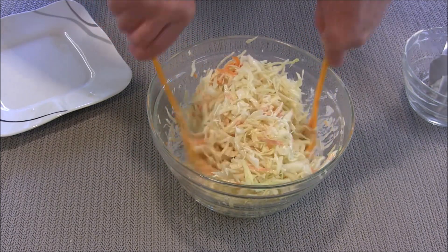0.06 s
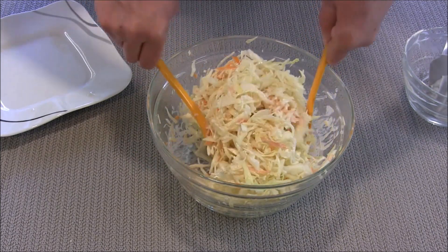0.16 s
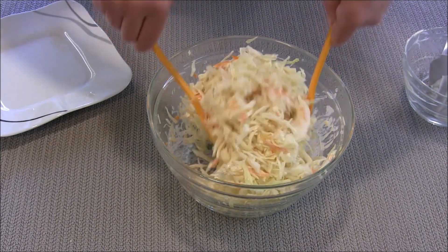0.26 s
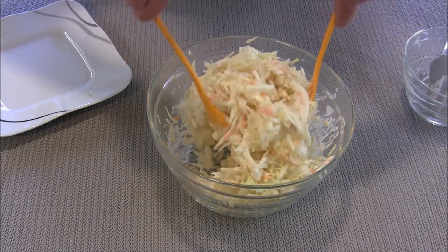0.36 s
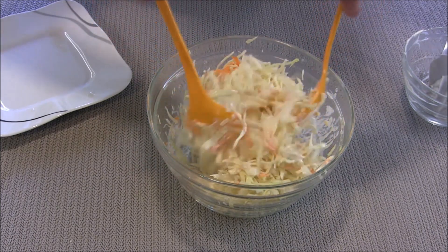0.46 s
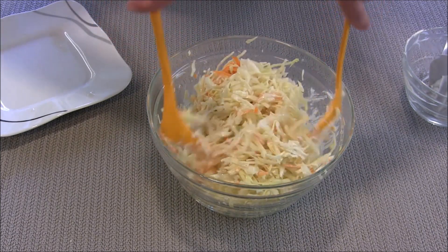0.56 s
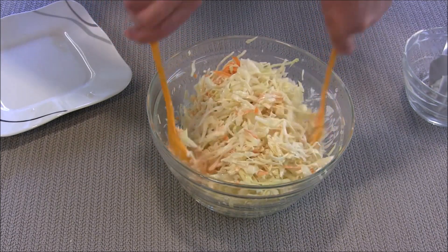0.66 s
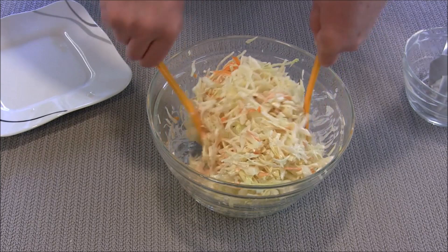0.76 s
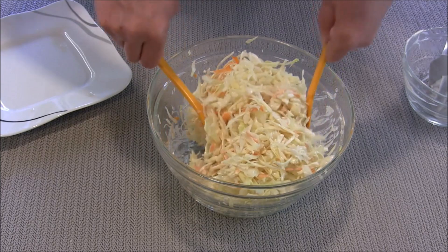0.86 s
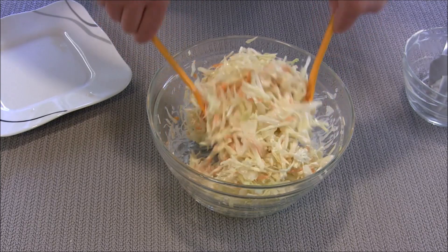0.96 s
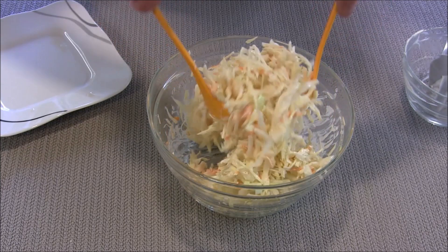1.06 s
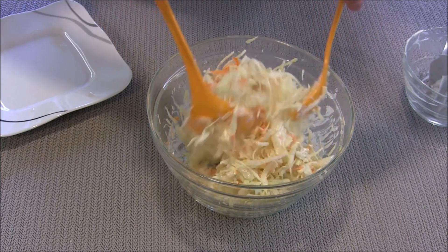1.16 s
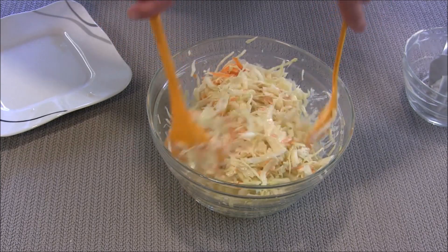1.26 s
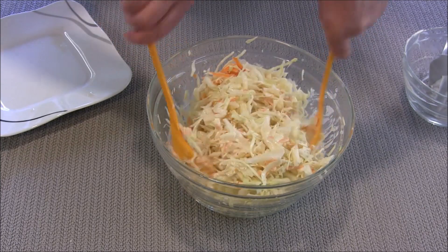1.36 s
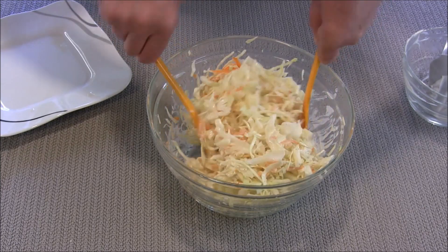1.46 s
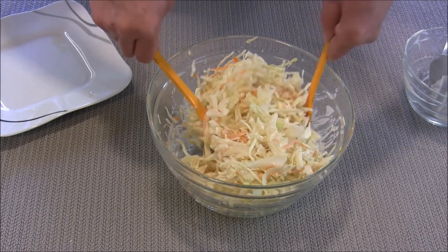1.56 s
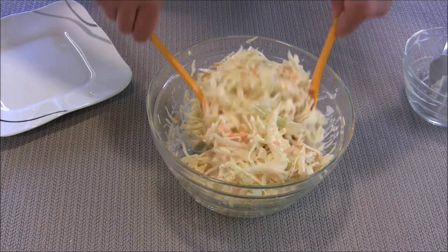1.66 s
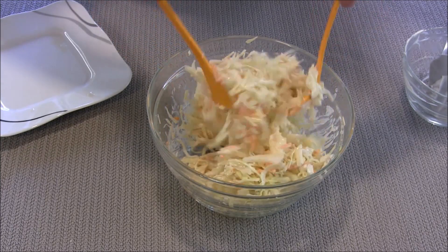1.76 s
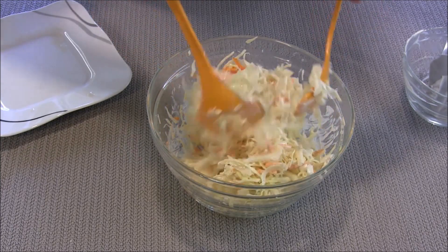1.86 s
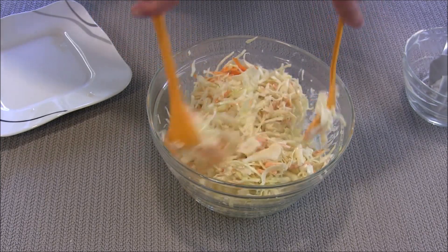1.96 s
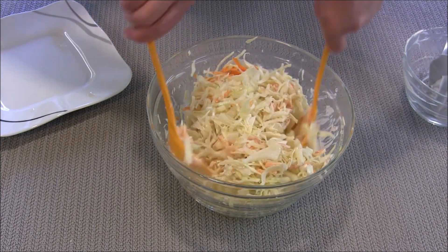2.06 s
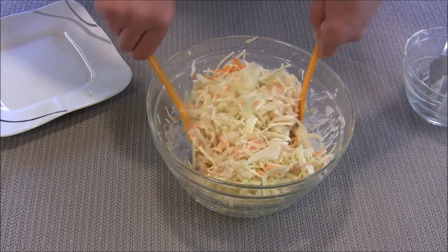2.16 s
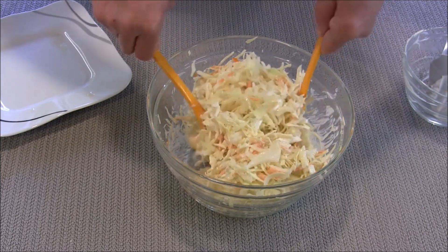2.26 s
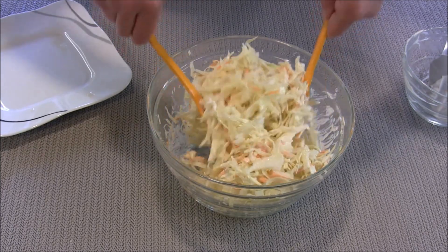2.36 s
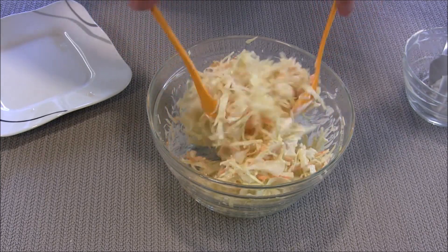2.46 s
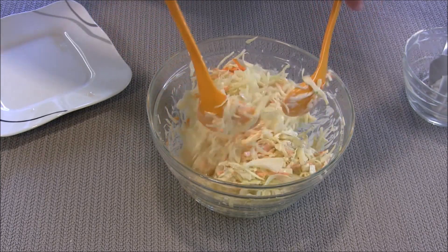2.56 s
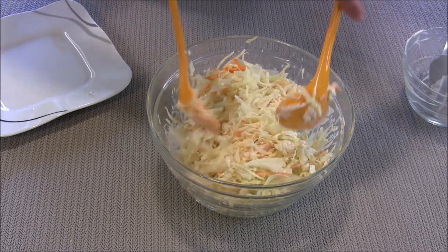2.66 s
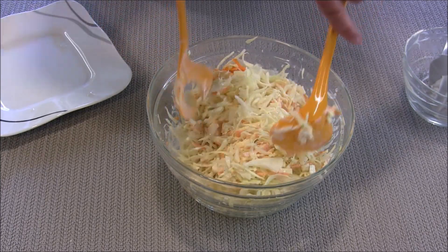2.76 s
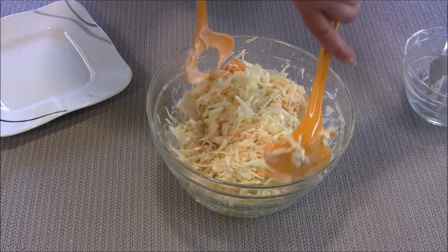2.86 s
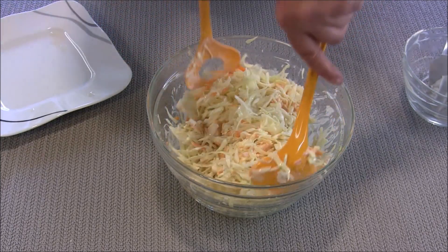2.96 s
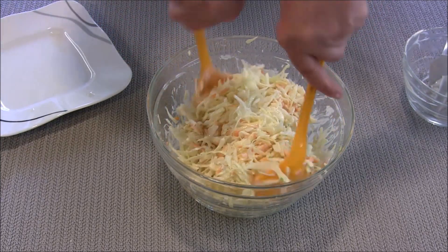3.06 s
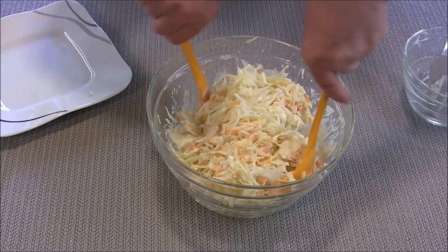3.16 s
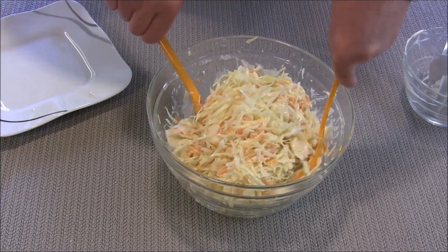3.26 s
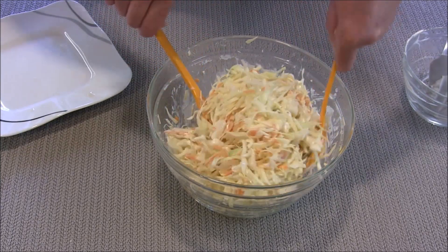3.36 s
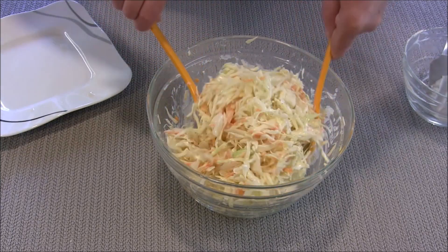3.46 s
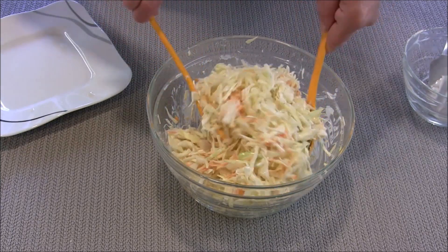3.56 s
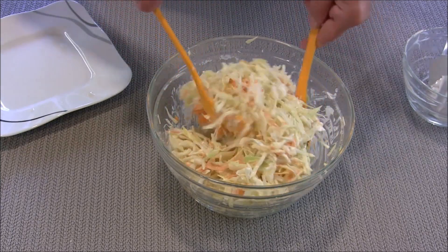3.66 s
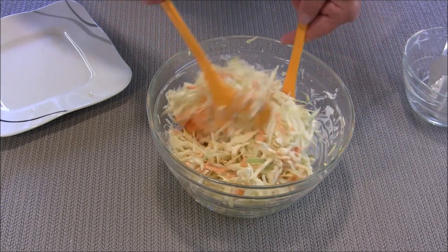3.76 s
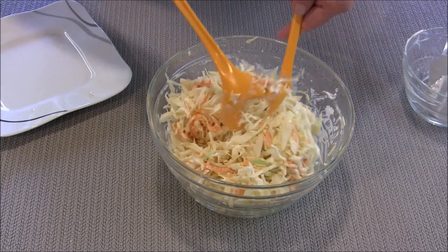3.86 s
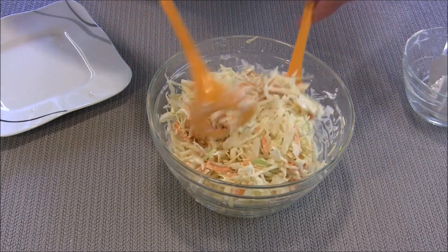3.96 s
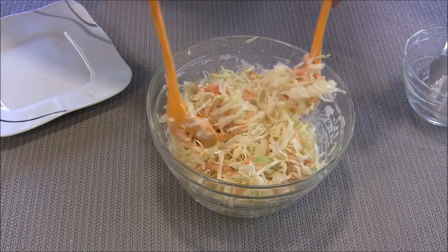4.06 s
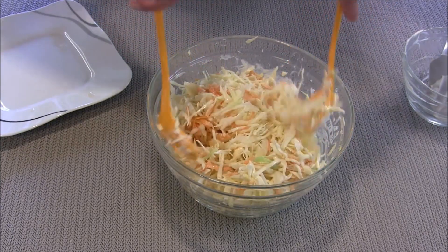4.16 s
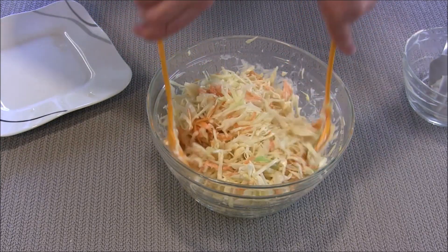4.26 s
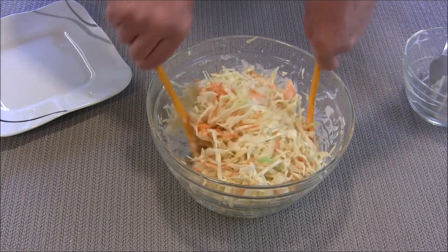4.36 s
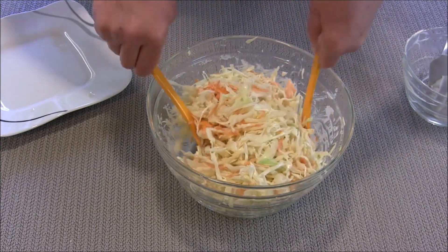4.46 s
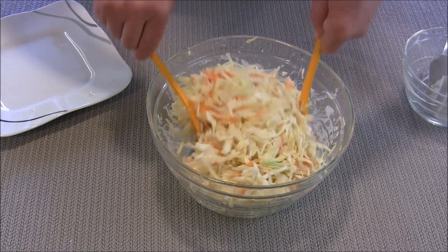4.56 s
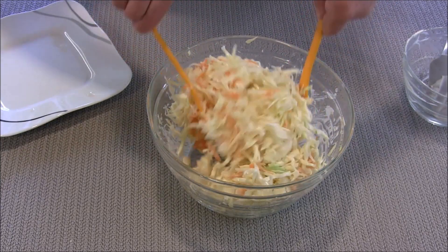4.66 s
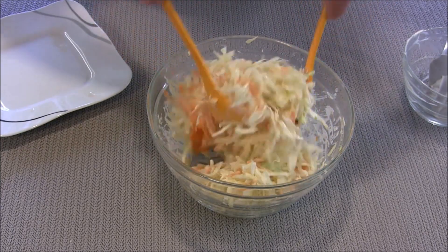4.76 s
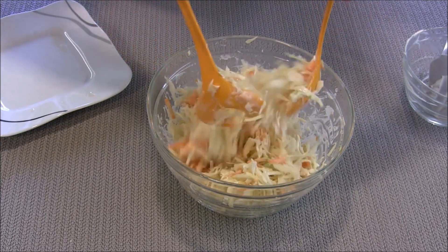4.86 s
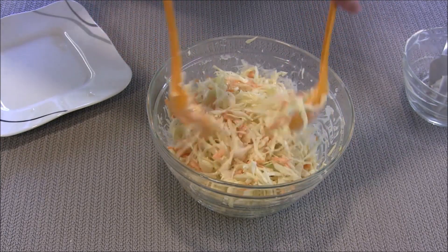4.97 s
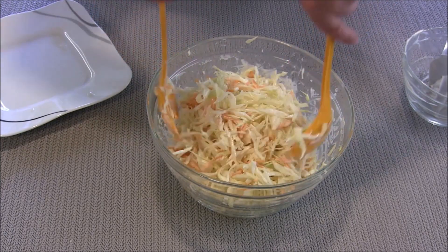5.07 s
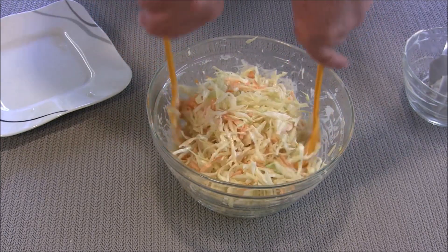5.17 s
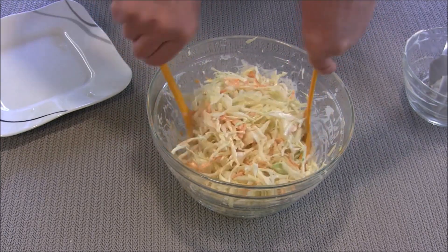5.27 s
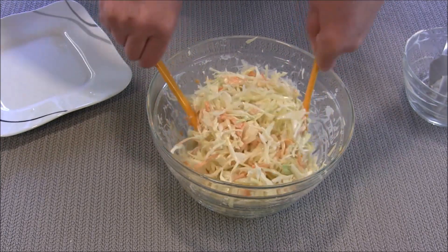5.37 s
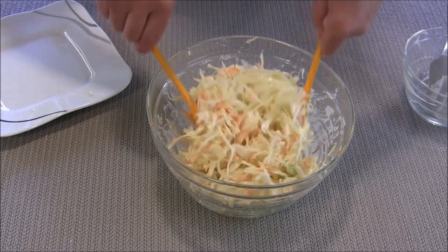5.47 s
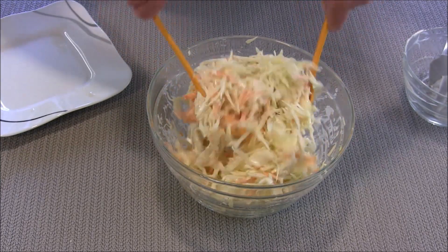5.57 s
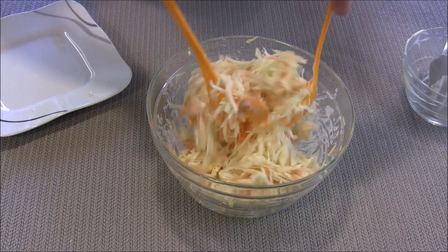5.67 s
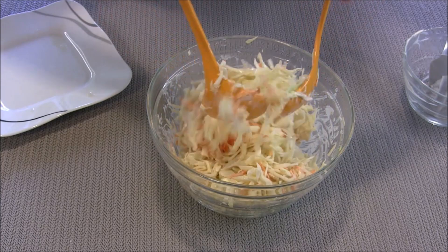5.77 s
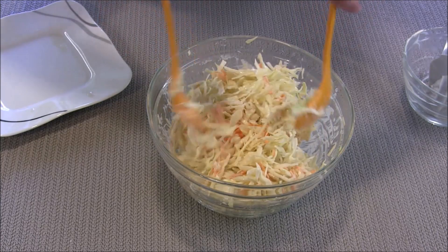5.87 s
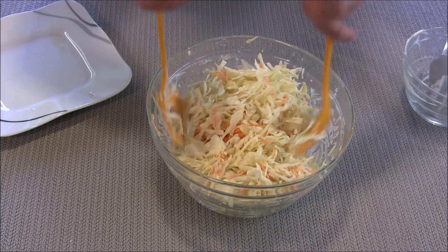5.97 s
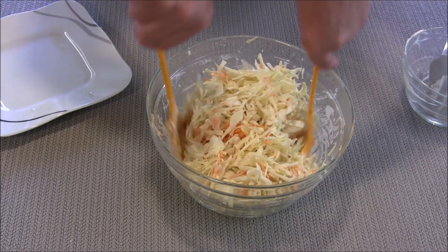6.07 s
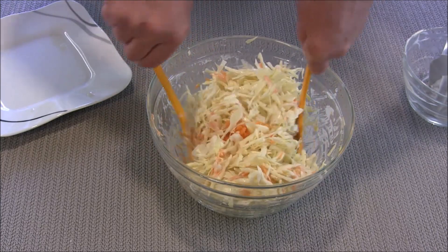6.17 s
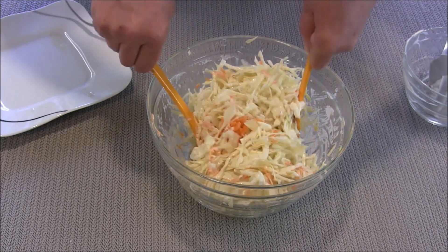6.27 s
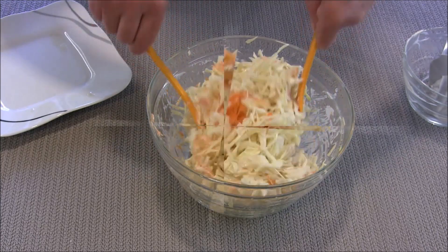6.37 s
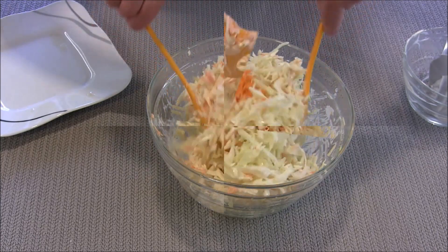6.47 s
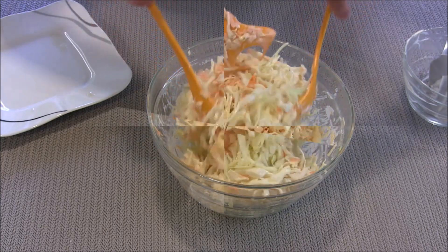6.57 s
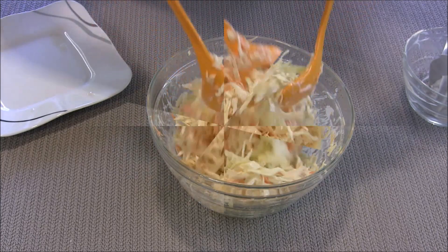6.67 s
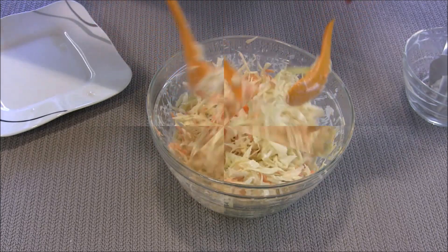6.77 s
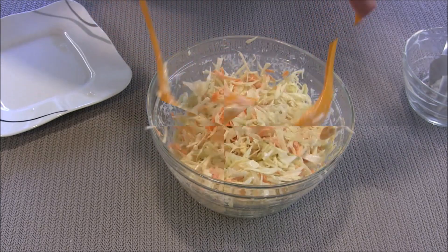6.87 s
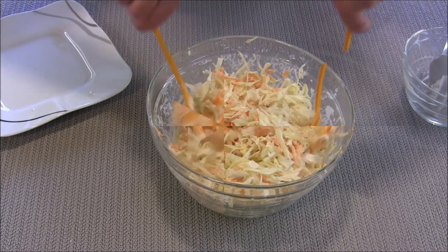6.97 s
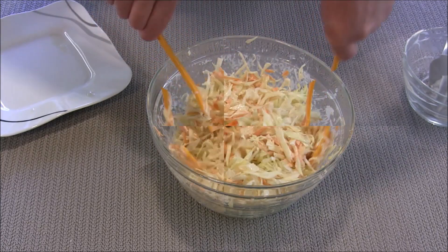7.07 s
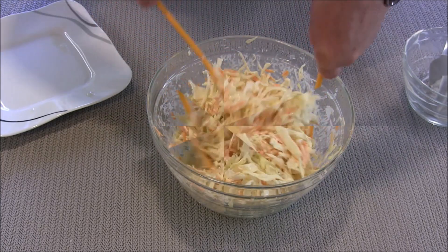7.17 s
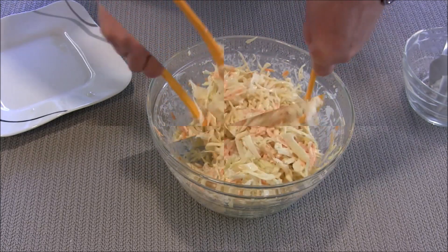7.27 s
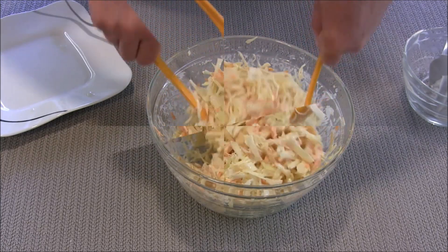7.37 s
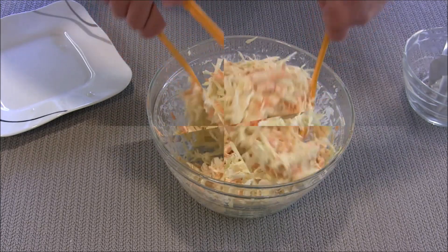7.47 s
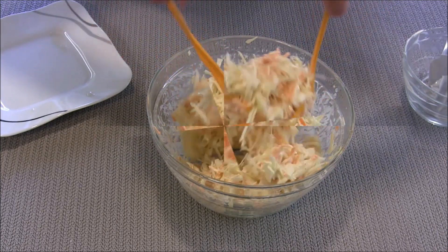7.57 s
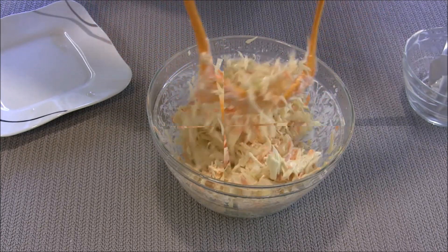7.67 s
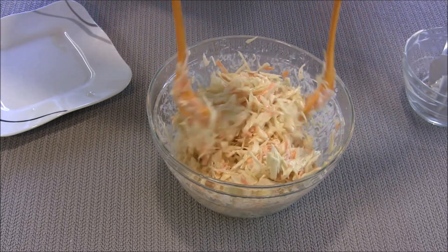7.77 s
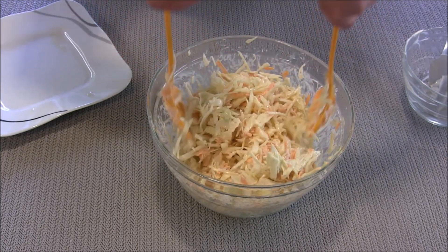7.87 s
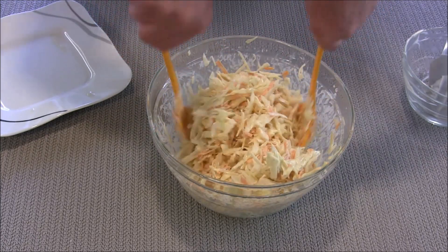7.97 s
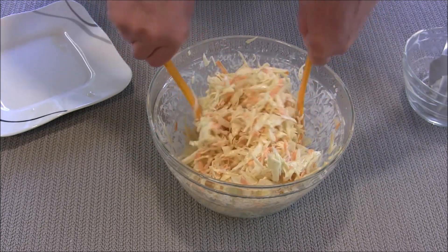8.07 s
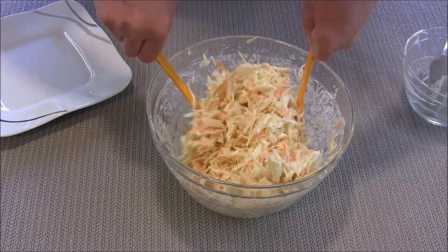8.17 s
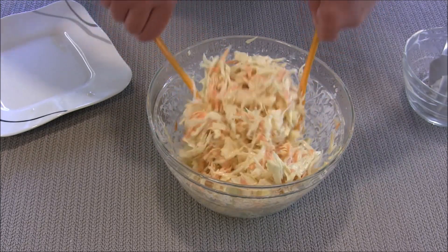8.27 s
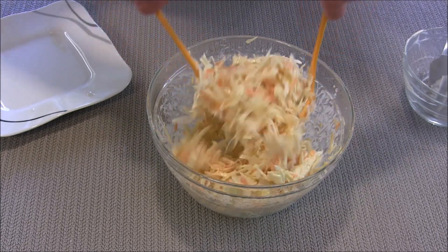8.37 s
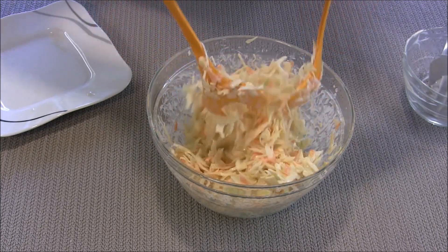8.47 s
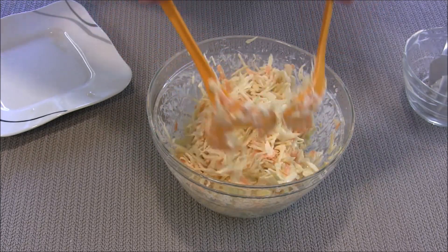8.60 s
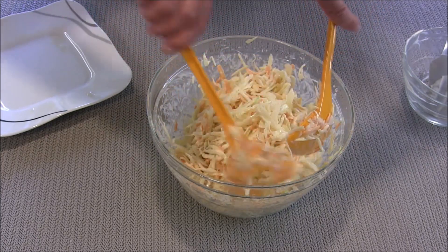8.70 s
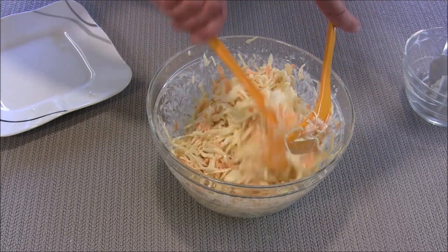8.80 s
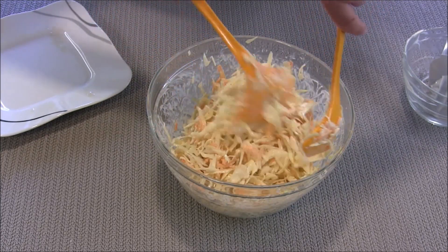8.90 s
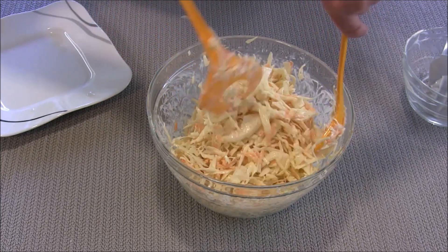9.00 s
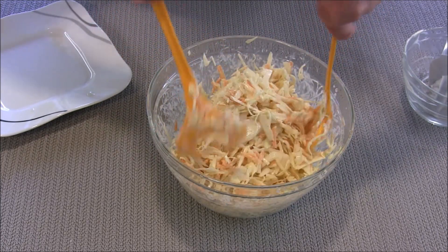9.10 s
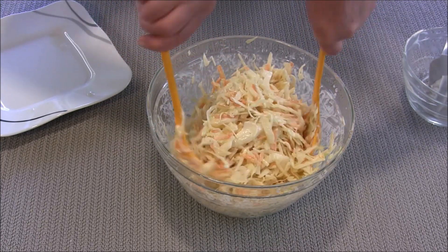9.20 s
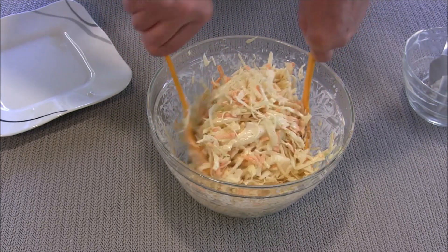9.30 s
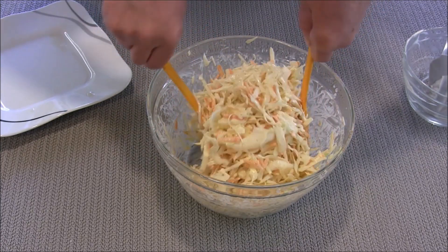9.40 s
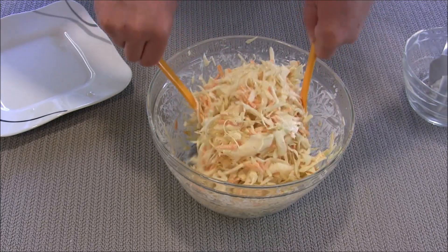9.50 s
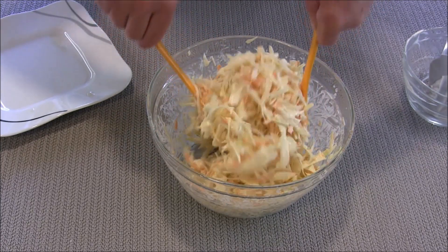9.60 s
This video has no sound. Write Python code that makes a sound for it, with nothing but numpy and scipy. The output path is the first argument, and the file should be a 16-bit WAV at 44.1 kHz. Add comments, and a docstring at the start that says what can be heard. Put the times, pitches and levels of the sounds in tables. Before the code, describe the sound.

Plastic servers toss damp shredded cabbage in a glass bowl, knocking the wall with bright clinks and clacks amid soft wet rustling.

```python
"""In a small kitchen, two plastic servers toss shredded cabbage in a glass bowl on a cloth-covered table.
Knocks on the glass make a noisy click and a set of decaying tones; sliding blades make single tones swell.
Pushes and knocks shake the table with low tones and a soft thud. Plastic clacks are short noise bursts,
each with some ring of the handle. Filtered noise and tiny clicks make the damp shreds rustle with each
squeeze and patter back into the bowl, over a faint room hum and hiss."""
import sys
import numpy as np
from scipy import signal
from scipy.fft import rfft, irfft, next_fast_len
from scipy.io import wavfile

SR = 44100
rng = np.random.default_rng(int(sys.argv[2]) if len(sys.argv) > 2 else 0)


def wav_record(signal):
    """Record a signal, one row per channel, as 16-bit PCM in the file named by sys.argv[1]."""
    frames = np.transpose(np.atleast_2d(signal))
    bounded = np.clip(frames, -1, 1)
    # unit amplitude maps onto the largest positive 16-bit level
    quanta = np.round(bounded * 32767).astype(np.int16)
    wavfile.write(sys.argv[1], SR, quanta)


N = 425124

# All levels in the tables are relative: the functions add their own balance.
# Servers knocking the glass wall: t/s, contact click level/dB, ring level/dB, extra drive of the lowest
# mode/dB, extra drive of the upper modes (hardness)/dB, spot on a belly (+) or node (-) of the third mode/dB
GLASS_KNOCKS = [(.0777, -32.5, -58.5, 9, 17, -23), (.1151, -28, -45, 0, -21, -1),
                (.2818, -15, -45.5, -13, 0, 2), (.7103, -1.5, -33.5, 1, 23, 0),
                (.7956, -4.5, -38.5, -1.5, 14, 2), (.9353, -10.5, -39.5, -10.5, 11.5, -4),
                (1.4272, -2, -38.5, 4, 20.5, -1.5), (1.4504, -18, -40.5, 1.5, 15, 6),
                (1.6322, -13, -39.5, -13, 6, -1), (2.1261, -2, -34.5, -0.5, 19.5, -0.5),
                (2.153, -11, -35, 4, 8, 1.5), (2.3176, -13.5, -45, -8, 10, -1.5),
                (3.041, -0.5, -37, -4, 27.5, 6.5), (3.0618, -7.5, -46.5, 8.5, 6, 7),
                (3.1288, -19.5, -51.5, -0.5, -3, -7), (3.3184, -37, -58, -23, 8, 2.5),
                (3.4226, -14, -41, -12.5, 11.5, -1.5), (4.2892, 2.5, -33.5, -5.5, 24, 1.5),
                (4.5965, -23.5, -46, -10.5, 8, 0.5), (5.2076, 1.5, -31.5, 2.5, 25, -0.5),
                (5.2654, -12, -38, 3, 9, 0.5), (6.1404, -30.5, -54, 0.5, -10, -0.5),
                (6.1863, -27, -67.5, -5, 21.5, -7), (6.7544, -44, -64.5, 3, 4, 4),
                (6.9885, -16, -43.5, 2.5, 16.5, 4.5), (7.0359, -15.5, -44.5, -1, 7, -0.5),
                (7.1586, -36, -56, 15, 8, 1), (7.9585, -7.5, -33, 2, 20.5, -4.5),
                (7.9854, -4.5, -29, -9.5, 7.5, -5), (9.189, -20, -51, -2, -1, 2),
                (9.2559, -3, -38, -8, 19, -1.5)]
# Blade sticking and slipping on the glass: t/s, length/s, resonance it feeds f/Hz, level/dB
BLADE_SLIDES = [(.797, .02, 2622, -30), (.803, 0.02, 1503, -30.5), (1.45, 0.023, 2610, -33.5),
                (3.197, .03, 343, -36), (4.286, 0.11, 2622, -20.5), (4.33, 0.06, 1503, -38),
                (4.365, 0.017, 5600, -34), (6.094, 0.041, 657, -48), (6.76, 0.038, 1500, -55),
                (6.93, 0.086, 651, -54), (6.932, .04, 2640, -55), (6.983, 0.022, 4050, -37),
                (7.965, 0.035, 3990, -29), (9.26, 0.036, 4000, -39)]
# Dry plastic clacks and snaps: t/s, peak level/dB, then relative to it: body level at 1-2.5 kHz/dB,
# edge level above 9 kHz/dB, handle ring level/dB
PLASTIC_CLACKS = [(.1998, -2, -19, 6.5, -42), (1.5309, -21.5, 11, -9, -30), (2.711, -36.5, -3, 10, -41),
                  (2.882, -29.5, 7, 20.5, -42), (3.249, -24, 5, 3, -37), (3.256, -23, 0, 9, -35),
                  (3.801, -41, -4, -1, -40), (4.4686, 7.5, -6, 11, -52), (4.504, -3, -10, -1.5, -16.5),
                  (5.395, -25.5, -7, 11.5, -39), (6.244, -33, -0.5, 1.5, -32), (7.277, -20.5, 10, 3.5, -23),
                  (7.724, -11.5, 5, -3, -55), (8.185, -24.5, 23, -6, -32), (8.207, -34, 9.5, 9, -34.5),
                  (8.864, -9, -1.5, 4, -33)]
# Ways the bowl's wall rings, the first four being its low bending modes: f/Hz, level/dB, t60/s
GLASS_MODES = [(654, -.5, 0.45), (1500, 1, 0.32), (2621, 5.5, 0.29), (3996, 0, 0.31), (5600, -11.5, 0.44),
               (5674, -5.5, 0.2), (5870, -9, 0.076), (6480, -8.5, 0.041), (7360, -9, 0.086),
               (7490, -4.5, 0.19), (7900, -14.5, 0.093), (8600, -23, .1), (9600, -12.5, .13),
               (11760, -20.5, .12), (12540, -9, 0.03), (13672, -19.5, .15), (14226, -22, 0.14)]
# Ways the table and bowl shake together: f/Hz, level/dB, t60/s
TABLE_MODES = [(100, -21.5, .16), (126, -16, 0.16), (154.5, -13.5, .28), (205, -14.5, 0.16),
               (240.5, -6, .25), (328, 1, 0.26), (359.4, 2, 0.24), (369.4, -8, 0.3), (600, -13.5, 0.2),
               (738, -10, 0.16), (837, -13, 0.17), (1030, -17.5, 0.081)]
# Tone colour of plastic touching glass: f/Hz, level/dB
CONTACT_COLOUR = [(100, -30), (600, -19), (1500, -5.5), (3000, -5), (5000, 1), (6500, 1.5), (8000, -1),
                  (10500, -9.5), (12500, -7), (14500, -14.5), (16000, -16)]
# Tone colour of plastic hitting plastic: f/Hz, level/dB
PLASTIC_COLOUR = [(100, -26), (700, -22), (1800, -9), (3200, 0.5), (5500, 5), (6800, -2), (8000, -3.5),
                  (9700, -16.5), (11500, -8), (14500, -11.5), (16000, -25.5)]
# Tone colour of the table's dull thud: f/Hz, level/dB
THUD_COLOUR = [(30, -28), (80, -15), (140, -2.5), (330, 5.5), (450, -6.5), (750, 2.5), (1100, -12),
               (2000, -11.5), (6000, -54.5)]
# Tone colour of shreds rubbing together: f/Hz, level/dB
RUB_COLOUR = [(150, -1.5), (350, 7.5), (600, 3), (1200, 1), (2500, -2), (5000, -5), (9000, -17),
              (16000, -16.5)]
# Tone colour of the room's hum and hiss: f/Hz, level/dB
AIR_COLOUR = [(20, -16), (55, -32.5), (130, -21), (270, -16.5), (345, -8), (420, -16.5), (738, -15.5),
              (1190, -20), (2140, -21.5), (2650, -17.5), (3000, -22.5), (6010, -26), (13200, -33.5),
              (16000, -36.5)]
# Ways a server's handle rings: f/Hz, level/dB, t60/s
HANDLE_MODES = [(3090, 2, 0.079), (3250, 0, .06), (3470, 3.5, .06), (4050, -1, 0.055), (5450, -1.5, .06),
                (6020, -3.5, .08)]
# How differently the two microphones hear the same sound: f/Hz, level/dB
STEREO_COLOUR = [(100, -7.5), (2000, -4), (4500, -4), (8000, 0.5), (12000, -0.5), (16000, 0.5)]
# Tone colour of the blade's hollow judder: f/Hz, level/dB
JUDDER_COLOUR = [(200, -22.5), (900, -4.5), (1700, -6.5), (2500, 3), (3500, 4), (6000, -14.5),
                 (10000, -22.5), (16000, -19.5)]
# Servers pressing the bowl onto the table: t/s, level/dB, length of the push/s, relative deep boom level/dB
TABLE_PUSHES = [(.19, -40, 0.017, 0.5), (.851, -50.5, 0.0096, 0), (.937, -49, 0.0054, 1),
                (1.53, -55, .014, 16.5), (2.26, -58.5, 0.036, 9), (3.2, -50.5, 0.024, -8),
                (3.243, -51.5, .019, 10), (4.469, -37.5, 0.0073, 3.5), (4.503, -39.5, .012, -4.5),
                (5.383, -61, 0.018, 15), (6.233, -57, 0.016, 16), (7.244, -57, 0.024, 13),
                (9.358, -60.5, .015, 14)]
# Tosses: moment of the squeeze t/s, squeeze level/dB, digging time/s, falling shreds level/dB
SALAD_TOSSES = [(.24, -52, 0.56, -76), (.9, -53, 0.13, -70), (1.58, -55.5, 0.14, -72),
                (2.3, -53.5, 0.093, -63), (3.25, -49, 0.098, -65.5), (4.53, -52.5, 0.14, -67.5),
                (5.4, -54.5, .12, -74), (6.25, -58.5, 0.12, -61), (7.22, -51, 0.27, -60.5),
                (8.12, -58, .12, -70.5), (9.38, -58, 0.088, -73)]
# Tone colour of a single shred breaking: f/Hz, level/dB
SNAP_COLOUR = [(300, -20), (2000, -3.5), (6000, -0.5), (12000, -2.5), (16000, -6.5)]

AIR_DB = -62.5
TOP_HZ = 15900
# every knock also jolts the table: level relative to its ring, length of the push, deep boom
JOLT_DB, JOLT_S, JOLT_BOOM_DB = -21, .012, -2
# the squeeze dies away; the lifted shreds land later, spread in time
SETTLE_S, FALL_AFTER_S, FALL_SPREAD_S = .12, 0.4, .21


def undb(db):
    """Turn decibels into a plain multiplier."""
    return 10 ** (np.asarray(db) / 20)


def unit(x):
    """Scale to rms 1."""
    return x / np.sqrt(np.mean(x ** 2))


def fade(t, t60):
    """Exponential decay, 60 dB down after t60 seconds."""
    return np.exp(-np.log(1000) * t / t60)


def add(track, s, sound):
    """Mix a sound into a track at time s in seconds."""
    i = max(int(s * SR), 0)
    track[i:i + len(sound)] += sound[:max(N - i, 0)]


def gain_at(hz, points):
    """Read a tone colour's gain at the given frequencies."""
    f, db = np.transpose(points)
    return undb(np.interp(np.log(hz + 1), np.log(f), db))


def colour(x, points, size=4096):
    """Filter with a tone colour, never sounding ahead of time; white noise keeps its power."""
    gain = unit(gain_at(np.fft.rfftfreq(size, 1 / SR), points))
    # folding the cepstrum makes the filter respond as early as it can (minimum phase)
    cepstrum = irfft(np.log(gain))
    cepstrum[1:size // 2] *= 2
    cepstrum[size // 2 + 1:] = 0
    response = irfft(np.exp(rfft(cepstrum)))
    return signal.fftconvolve(x, response)[:len(x)]


def walk(rate, size=N):
    """Random drift with a spread a little below 1, from `rate` random points a second joined by lines."""
    knots = rng.standard_normal(int(size / SR * rate) + 2)
    return np.interp(np.arange(size) / SR * rate, np.arange(len(knots)), knots)


def tick(t):
    """A single hard impact: one sample."""
    return (t == 0) * 1.


def chatter(t, t60):
    """Rapid micro-impacts that die away: a noise burst whose energy depends only on its fade."""
    envelope = fade(t, t60)
    burst = rng.standard_normal(len(t)) * envelope
    return burst * np.sqrt(np.sum(envelope ** 2) / np.sum(burst ** 2))


def room_air(level_db=0, width=.3):
    """The room's faint hum and hiss: coloured noise that drifts very slightly in level."""
    mid, side = (colour(rng.standard_normal(N), AIR_COLOUR) for _ in range(2))
    level = undb(AIR_DB + level_db + 0.13 * walk(3))
    return level * np.array([mid + width * side, mid - width * side])


def stirring():
    """How briskly the cabbage moves: it builds to a squeeze and settles, then the lifted shreds land."""
    t, power = np.arange(N) / SR, 0
    for s, squeeze_db, dig_s, fall_db in SALAD_TOSSES:
        squeeze = np.exp(-np.maximum((s - t) / dig_s, (t - s) / SETTLE_S))
        fall = np.exp(-((t - s - FALL_AFTER_S) / FALL_SPREAD_S) ** 2 / 2)
        power = power + (undb(squeeze_db) * squeeze) ** 2 + (undb(fall_db) * fall) ** 2
    return np.sqrt(power)


def cabbage(rub_db=-5, crackle_db=-8, rate=900, spread_db=2.0, flicker_db=1.53):
    """Damp shreds rub and snap: an uneven rustle holds about `rate` tiny smeared clicks a second."""
    sizes = undb(spread_db * np.minimum(rng.exponential(size=N), 4))
    clicks = (rng.random(N) < rate / SR) * sizes
    smeared = signal.lfilter([1], [1, -fade(1 / SR, 0.0089)], clicks)
    crackle_tone = [(300, -15), (1500, 5.5), (4000, -2.5), (9000, -7.5), (16000, -11.5)]
    crackle = colour(unit(smeared * rng.standard_normal(N)), crackle_tone)
    rub = colour(rng.standard_normal(N), RUB_COLOUR) * undb(flicker_db * walk(35))
    return stirring() * (undb(rub_db) * rub + undb(crackle_db) * crackle)


def lone_snaps(level_db=22, spread_db=3.5, t60=0.016, count=110):
    """Single crisp shreds break at random moments, louder while the heap is moving."""
    out, t = np.zeros(N), np.arange(SR // 40) / SR
    for when, size, pitch in rng.random((count, 3)):
        tone = [(1000, -10), (2500 + 7000 * pitch, 0), (16000, -12)]
        crack = colour(chatter(t, t60), tone)
        loudness = undb(level_db - spread_db * np.log(size + .05))
        add(out, when * N / SR, loudness * crack / np.linalg.norm(crack))
    return colour(out, SNAP_COLOUR) * stirring()


def thumps(ring_db=-0.5, thud_db=-1, count=3000):
    """A push cushioned by cabbage shakes the table; the softer it is, the more boom and the less knock."""
    out, t = np.zeros(N), np.arange(SR // 2) / SR
    jolts = [(s, knock_db + JOLT_DB, JOLT_S, JOLT_BOOM_DB) for s, _, knock_db, *_ in GLASS_KNOCKS]
    for s, db, length, boom_db in TABLE_PUSHES + jolts:
        push = t / length * np.exp(-2 * t / length)
        cushion = [(130, boom_db), (320, 0.001), (800, -boom_db / 2)]
        ring = 0
        for (hz, mode_db, t60), turn in zip(TABLE_MODES, rng.random(len(TABLE_MODES))):
            # the push feeds each mode, which then dies away
            swell = signal.lfilter([1], [1, -fade(1 / SR, t60)], push)
            tone = np.sin(2 * np.pi * (hz * t + turn))
            ring = ring + undb(mode_db) * gain_at(hz, cushion) * swell * tone
        thud = colour(colour(rng.standard_normal(len(t)) * push, THUD_COLOUR), cushion)
        # levels are set by the first `count` samples
        ring = undb(db + ring_db) * ring / np.std(ring[:count])
        thud = undb(db + thud_db) * thud / np.std(thud[:count])
        add(out, s, ring + thud)
    return out


def bowl_ring(low_db=3.5, upper_db=-3, twin=1.0, split=.004, load=0.0012, scatter_db=2.1,
              rough=0.82, rough_t60=0.4, soak=1.4, soak_t60=0.039, kept=.72, count=4):
    """Each knock rings the wall; every mode has a close twin, and the shifting salad detunes it a little."""
    out, t = np.zeros(N), np.arange(SR // 2) / SR
    attack, touch = 1 - fade(t, 0.0076), rough * fade(t, rough_t60)
    for s, _, ring_db, depth_db, hardness_db, spot_db in GLASS_KNOCKS:
        # the third mode's bellies lie near its neighbours' nodes
        place_db = [depth_db, -spot_db / 2, spot_db, -spot_db / 2]
        chance = rng.standard_normal((len(GLASS_MODES), 3))
        for k, ((hz, db, t60), (detune, apart, luck)) in enumerate(zip(GLASS_MODES, chance)):
            # the bending modes follow the blow and where it lands; a hard edge wakes the upper ones
            bending = k < count
            if bending:
                drive_db = ring_db + low_db + place_db[k]
            else:
                drive_db = ring_db + upper_db + hardness_db + scatter_db * luck
            # the blade stays against the glass for a moment and roughens the ring, the lowest mode least
            wobble, flutter = (touch * min(hz / 2000, 1) * walk(220, len(t)) for _ in range(2))
            phase = 2 * np.pi * hz * (1 + load * detune) * t + wobble
            pair = np.sin(phase) + twin * np.sin(phase * (1 + split * apart)) * fade(t, 2 * t60)
            # it also soaks up part of the upper modes within some milliseconds
            soaked = 1 if bending else kept + soak * fade(t, soak_t60)
            envelope = attack * (1 + flutter) * soaked * fade(t, t60)
            # neighbouring modes start in opposite directions
            add(out, s + .0007, (-1) ** k * undb(db + drive_db) * pair * envelope / (1 + twin))
    return out


def judder(level_db=-2.0, t60=0.12):
    """The blade judders against the vibrating wall: a noise burst in step with the ring's level."""
    out, t = np.zeros(N), np.arange(SR // 4) / SR
    for s, _, ring_db, *_ in GLASS_KNOCKS:
        add(out, s + .001, undb(ring_db + level_db) * chatter(t, t60))
    return colour(out, JUDDER_COLOUR)


def contacts(tick_db=1, snap_db=-13, snap_t60=0.0037, buzz_db=-18, buzz_t60=0.024, hardening=.3):
    """The hard click of plastic on glass and the blade's brief buzz; harder blows are brighter."""
    out, t = np.zeros(N), np.arange(SR // 10) / SR
    for s, db, *_ in GLASS_KNOCKS:
        snap = undb(snap_db) * chatter(t, snap_t60)
        buzz = undb(buzz_db) * chatter(t, buzz_t60)
        click = undb(tick_db) * tick(t) + snap + buzz
        tilt_db = hardening * (db + 13.0)
        tone = [(2500, -tilt_db / 2), (6000, 0), (13000, tilt_db / 2)]
        add(out, s + 0.0011, undb(db) * colour(click, tone))
    return colour(out, CONTACT_COLOUR)


def clacks(tick_db=4, snap_db=-11, snap_t60=0.011, rattle_db=-22, rattle_t60=0.07, handle_db=-7):
    """Well-damped plastic gives a short crack and rattle, plus some ring of the handle."""
    cracks, rings, t = np.zeros(N), np.zeros(N), np.arange(SR // 4) / SR
    handle = sum(undb(db) * fade(t, t60) * np.sin(2 * np.pi * hz * t) for hz, db, t60 in HANDLE_MODES)
    handle = handle * (1 - fade(t, 0.0066))  # soft start
    for s, db, body_db, edge_db, ring_db in PLASTIC_CLACKS:
        tone = [(1800, body_db), (3500, 0.0095), (6500, 0.0047), (10000, edge_db)]
        snap = undb(snap_db) * chatter(t, snap_t60)
        rattle = undb(rattle_db) * chatter(t, rattle_t60)
        crack = undb(tick_db) * tick(t) + snap + rattle
        add(cracks, s, undb(db) * colour(crack, tone))
        add(rings, s, undb(db + ring_db + handle_db) * handle)
    return colour(cracks, PLASTIC_COLOUR) + rings


def slides(grip=0.3, t60=0.23):
    """A sliding blade feeds one resonance, which swells unevenly and then rings out."""
    out, t = np.zeros(N), np.arange(SR // 2) / SR
    for s, length, hz, db in BLADE_SLIDES:
        rise = np.sin(np.pi / 2 * np.minimum(2 * t / length, 1))
        swell = rise * fade(np.maximum(t - length / 2, 0), t60)
        slip = grip * walk(90, len(t))
        add(out, s, undb(db) * swell * (1 + slip / 2) * np.sin(2 * np.pi * hz * t + slip))
    return out


def kitchen(x, wet_db, t60, treble_t60, width, gap=0.0055):
    """Direct sound plus a small room's short wash, made of fading noise and heard by two close microphones."""
    t = np.arange(SR // 2) / SR
    late = np.clip(t / gap - .5, 0, 1)  # the wash begins a moment after the direct sound
    lowpass = signal.butter(1, 6000, fs=SR, output="sos")
    tails = []
    for noise in rng.standard_normal((2, len(t))):
        low = signal.sosfilt(lowpass, noise)
        wash = (low * fade(t, t60) + (noise - low) * fade(t, treble_t60)) * late
        tails.append(unit(wash) / np.sqrt(len(t)))
    mid, side = (undb(wet_db) * signal.fftconvolve(x, tail)[:N] for tail in tails)
    return np.array([x + mid + width * side, x + mid - width * side])


def microphones(pair, spread_db=-16):
    """A quarter-cycle-shifted copy, with opposite signs left and right, parts the two sides most in the treble."""
    shifted = np.imag(signal.hilbert(pair.mean(axis=0), next_fast_len(N)))[:N]
    side = undb(spread_db) * colour(shifted, STEREO_COLOUR)
    return pair + np.array([side, -side])


def scene(left_db=-0.32):
    """Salad, table, glass and plastic sound together in the kitchen."""
    touches = contacts() + judder() + cabbage() + lone_snaps()
    touches = kitchen(touches, wet_db=-5, t60=.35, treble_t60=0.16, width=0.44)
    table = kitchen(thumps(), wet_db=-10, t60=.32, treble_t60=.2, width=.4)
    glass = kitchen(bowl_ring() + slides(), wet_db=-13, t60=.34, treble_t60=.24, width=.4)
    plastic = kitchen(clacks(), wet_db=-7.0, t60=0.31, treble_t60=0.081, width=.3)
    return microphones(glass + touches + plastic + table + room_air()) * undb([[left_db], [0]])


def record(dry):
    """Round the highest peaks softly, then cut what lies above TOP_HZ with a steep filter."""
    rounded = np.tanh(dry)
    return signal.sosfilt(signal.ellip(8, .2, 70, TOP_HZ, fs=SR, output="sos"), rounded)


dry = scene()
out = record(dry)
wav_record(out)
```